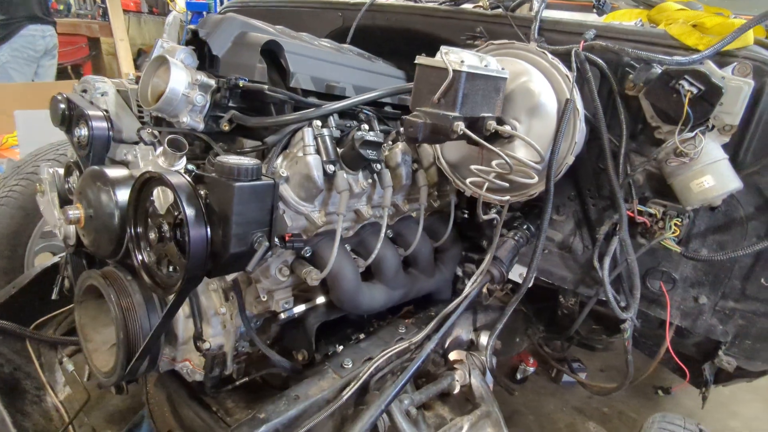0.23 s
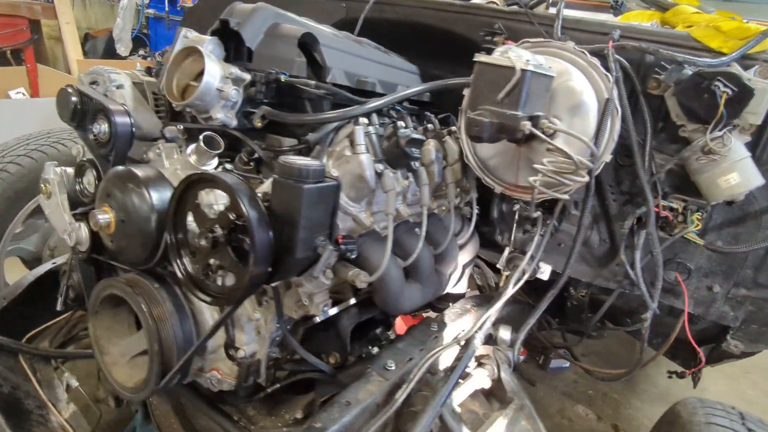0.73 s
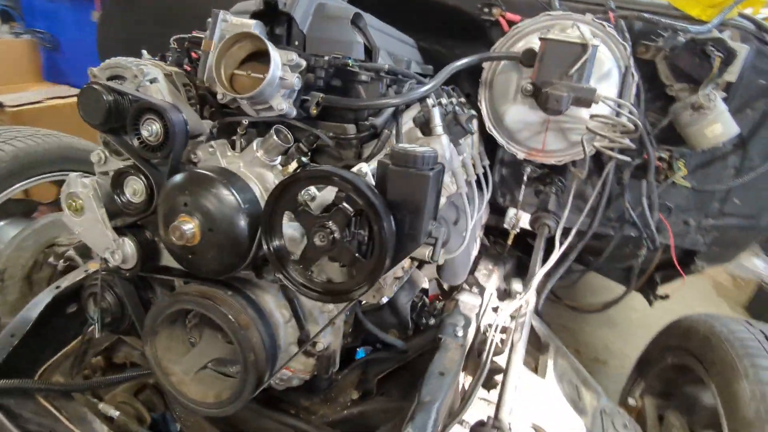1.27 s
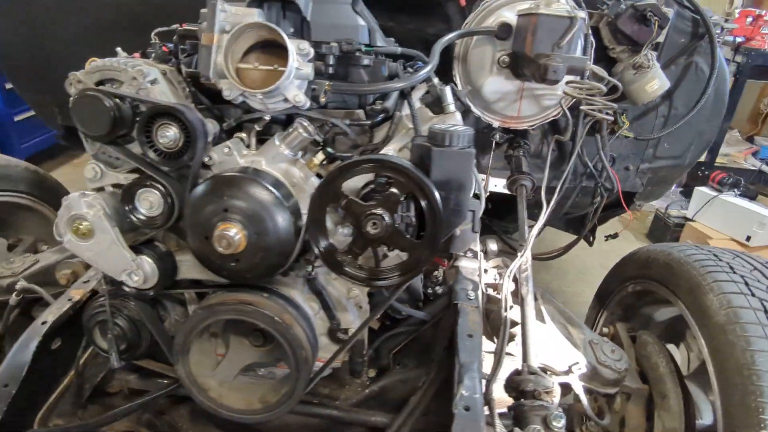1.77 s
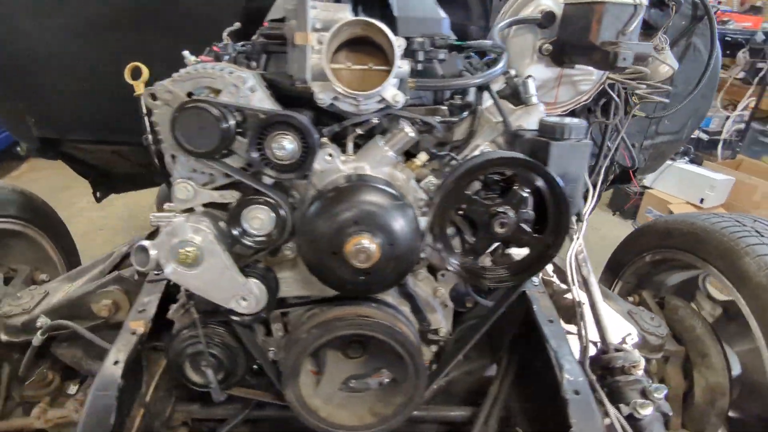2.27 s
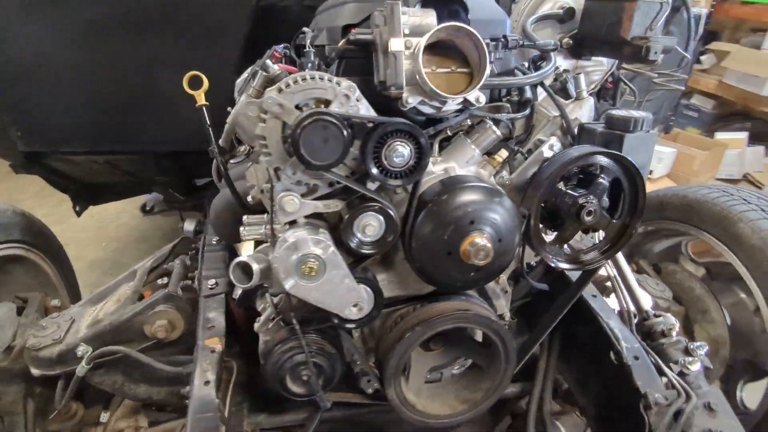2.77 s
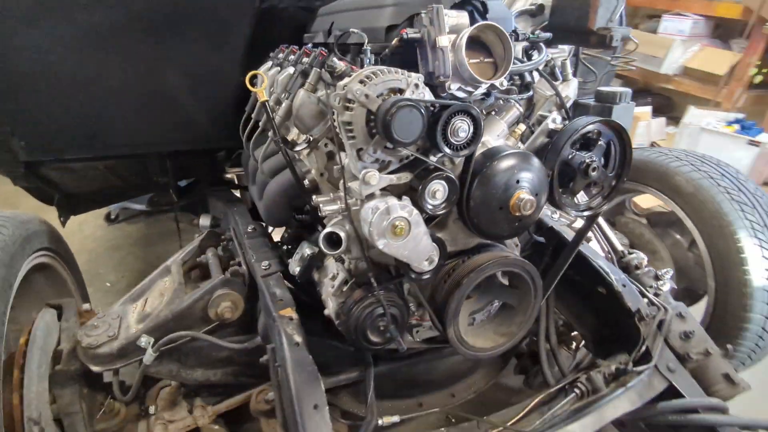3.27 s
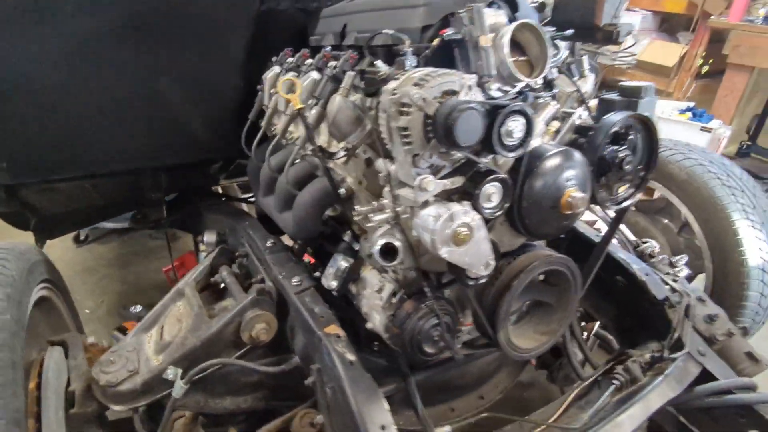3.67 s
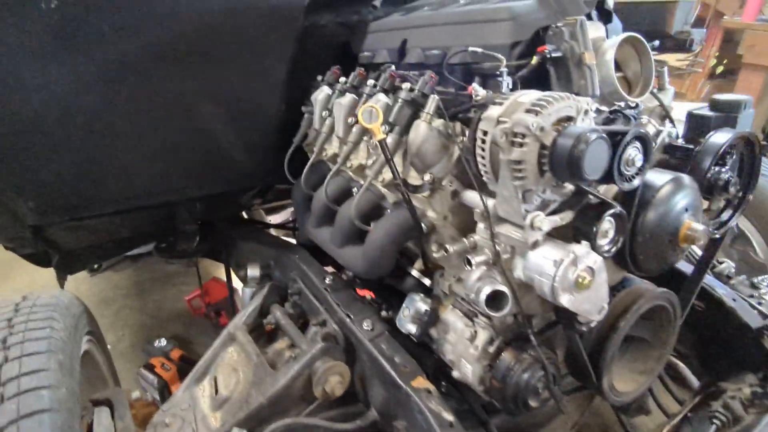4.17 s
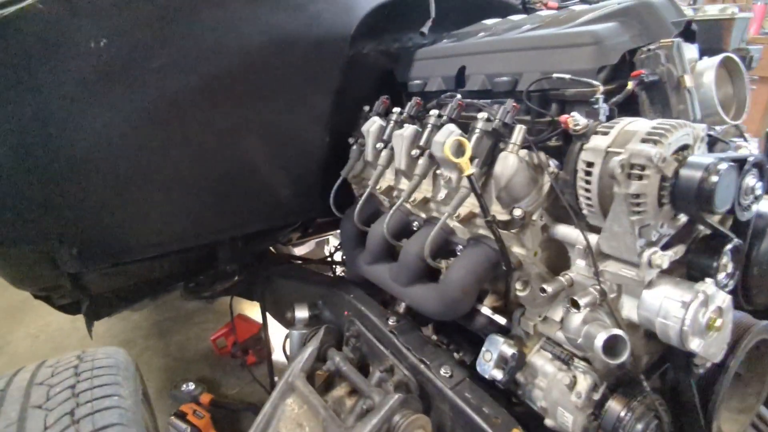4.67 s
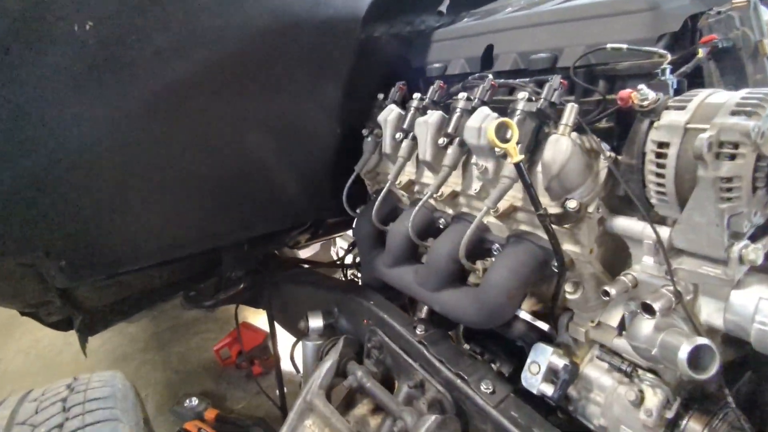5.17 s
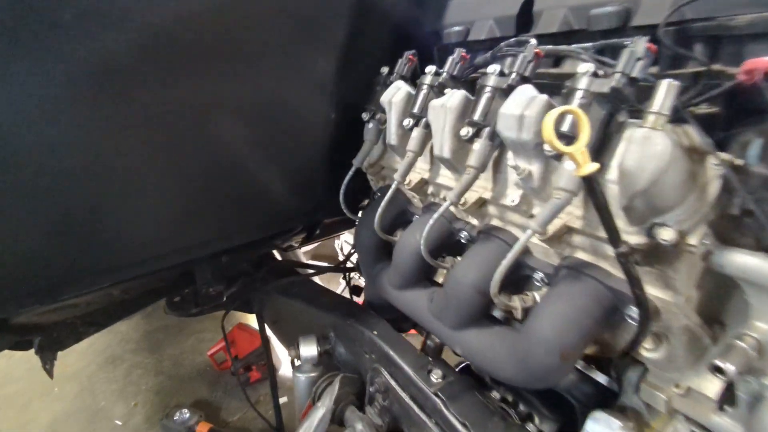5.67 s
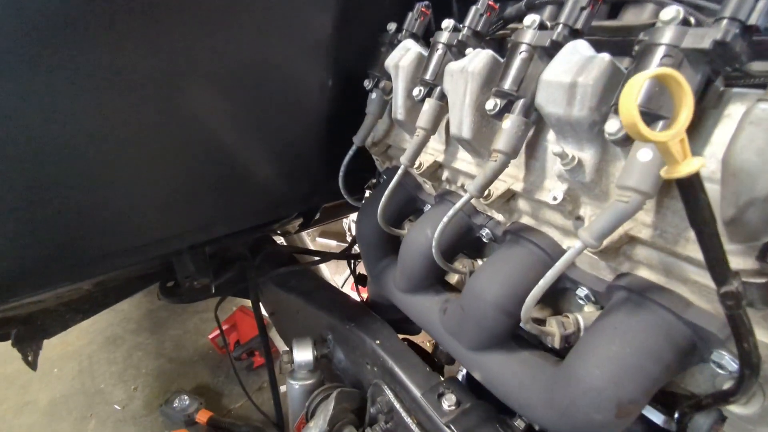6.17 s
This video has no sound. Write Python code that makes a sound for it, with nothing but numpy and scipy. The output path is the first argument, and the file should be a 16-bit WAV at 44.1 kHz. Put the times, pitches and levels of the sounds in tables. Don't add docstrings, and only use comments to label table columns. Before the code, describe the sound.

A low throbbing electric motor hum fills a workshop and grows louder, while shoe soles softly tap, drag and scrape on gritty concrete.

```python
import sys
import numpy as np
from scipy import signal
from scipy.fft import rfft, irfft, next_fast_len
from scipy.io import wavfile
from scipy.ndimage import uniform_filter1d, map_coordinates

SR = 44100
rng = np.random.default_rng(int(sys.argv[2]) if len(sys.argv) > 2 else 0)


def wav_out(sig):
    wavfile.write(sys.argv[1], SR, np.round(np.clip(np.atleast_2d(sig).T, -1, 1) * 32767).astype(np.int16))


def gain_from_db(level_db):
    decades = np.asarray(level_db, float) / 20
    return 10 ** decades


N = 282681


def unit(x):
    return x / np.sqrt(np.mean(x ** 2) + 1e-20)


def along(points, hz):
    f, value = np.transpose(points)
    return np.interp(np.log(hz + 1), np.log(f + 1), value)


def curves(rows):
    s, *columns = np.transpose(rows)
    return [np.interp(np.arange(N) / SR, s, column) for column in columns]


def wobble(rate):
    knots = rng.standard_normal(int(N * rate / SR) + 4)
    return map_coordinates(knots, [np.arange(N) * rate / SR])


def filtered(x, response):
    m = next_fast_len(N + 8192)
    return irfft(rfft(x, m) * response(np.fft.rfftfreq(m, 1 / SR)), m)[..., :N]


def tone(hz, db, drift, start=0):
    phase = 2 * np.pi * hz * (np.arange(N) / SR - start) + drift * wobble(1.7)
    return np.sqrt(2) * gain_from_db(db) * np.cos(phase)


def rush(spectrum, alike, patchy_db):
    z = signal.stft(rng.standard_normal((2, N)), nperseg=512)[2]
    patches = uniform_filter1d(rng.standard_normal(z.shape[1:]), size=6, axis=0)
    patches = uniform_filter1d(patches, size=12, axis=1)
    pair = signal.istft(z * gain_from_db(patchy_db * unit(patches)), nperseg=512)[1][:, :N]

    def mid_side(hz):
        turn = np.arccos(np.clip(along(alike, hz), -1, 1)) / 2
        return gain_from_db(along(spectrum, hz)) * [np.cos(turn), np.sin(turn)]

    mid, side = filtered(pair, mid_side)
    return unit(np.array([mid + side, mid - side]))


def grains(hz, count, spread, cycles, uneven_db):
    start = (rng.random((2, count)) * (N - 1)).astype(int)
    pitch = hz[start] * np.exp(spread * rng.standard_normal((2, count)))
    strength = gain_from_db(uneven_db * np.minimum(rng.exponential(size=(2, count)), 3.5))
    step = np.arange(200)
    turns = pitch[..., None] * step / SR
    wave = strength[..., None] * np.sin(2 * np.pi * turns) * turns * np.exp(-turns / cycles)
    streams = []
    for s, w in zip(start, wave):
        places = (s[:, None] + step).ravel()
        streams.append(np.bincount(places, w.ravel(), N + len(step))[:N])
    return unit(np.array(streams))


# t/s, twice-shaft level/dB, mains buzz level/dB
MOTOR_WALK = [(0, -50.5, -66.8), (.9, -50.2, -69), (1.4, -49.8, -59.8), (1.9, -48.6, -55.3),
              (2.4, -46, -51.6), (2.9, -43.3, -49.5), (3.6, -41.7, -51.3), (4.9, -39.8, -48.1),
              (6.41, -39.5, -46)]


def motor():
    shaft_hz, buzz_hz, first_throb_s = 58.8, 120.07, .058
    twice_db, buzz_db = curves(MOTOR_WALK)
    away_db = twice_db - twice_db.max()
    hum = tone(2 * shaft_hz, twice_db, .04, first_throb_s)
    buzz = tone(buzz_hz, buzz_db, .04, first_throb_s)
    shaft = tone(shaft_hz, -45.1 + .27 * away_db, .04, first_throb_s)
    sum_tone = tone(shaft_hz + buzz_hz, -57.5 + away_db, .04, first_throb_s)
    return hum + buzz + shaft + sum_tone


# f/Hz, level/dB (rms)
FAN_LINES = [(41.2, -60), (44.87, -63), (89.76, -57), (235.2, -70), (239.95, -68), (390, -72), (470.3, -69)]


def fans():
    return sum(tone(hz, db - 1 + 1.5 * wobble(1.5), .25) for hz, db in FAN_LINES)


# t/s, rumble level/dB, rush level/dB
AIR_LEVELS = [(0, -52, -54), (1.2, -55, -54.5), (2.2, -52.5, -55), (3.5, -52.5, -54), (4.5, -55.5, -55.5),
              (5.5, -54, -56), (6.41, -55.5, -58.5)]
# f/Hz, level/dB (per Hz)
RUMBLE_COLOUR = [(28, -21), (38, -18.5), (55, 21.5), (75, 18), (100, 19), (140, 18), (165, 16), (250, -2),
                 (400, -47)]
# f/Hz, level/dB (per Hz)
RUSH_COLOUR = [(120, -42), (200, 0), (250, -3.5), (400, -6.5), (500, -8.5), (950, -12.5), (1400, -19.5),
               (2100, -19), (2600, -26.5), (3500, -35), (5600, -52.5), (6500, -48), (7400, -61.5),
               (15600, -82)]
# f/Hz, left-right likeness [0 to 1]
AIR_LIKENESS = [(60, 0.65), (150, 0.77), (350, 0.89), (700, 0.23), (1400, 0.25), (3000, 0.081), (7000, .05)]
# t/s, lead [ms]
LEFT_LEAD = [
    (0, .33),
    (3.2, .33),
    (4.4, .05),
    (5.4, .05),
    (6.41, .3),
]


def air():
    rumble_db, rush_db = curves(AIR_LEVELS)
    rumble = gain_from_db(rumble_db + 4 + 1.2 * wobble(12)) * rush(RUMBLE_COLOUR, AIR_LIKENESS, 1.2)
    hiss = gain_from_db(rush_db + 1.5) * rush(RUSH_COLOUR, AIR_LIKENESS, 1.1)
    left, right = rumble + hiss
    late = np.arange(N) - np.round(curves(LEFT_LEAD)[0] * SR / 1000)
    return np.array([left, right[np.clip(late, 0, N - 1).astype(int)]])


# t/s, peak level/dB, f/Hz
FLOOR_BUMPS = [(0.116, -32, 105.7), (0.269, -43.5, 126), (0.941, -45, 180), (1.05, -39, 124),
               (1.27, -39, 129), (1.449, -38, 98), (1.7, -35, 97), (1.983, -37.5, 109), (2.069, -34, 122),
               (2.339, -32, 118), (2.838, -46, 119), (4.09, -42, 131), (4.645, -40, 102), (4.841, -34, 101),
               (4.979, -49, 100)]


def bumps():
    out, t = np.zeros(N + SR), np.arange(SR // 5) / SR
    rise = t / .011
    for s, db, hz in FLOOR_BUMPS:
        out[round(s * SR):][:len(t)] += gain_from_db(db) * rise * np.exp(1 - rise) * np.sin(2 * np.pi * hz * t)
    return out[:N]


# t/s, skid [s], sole scrape level/dB, dust hiss level/dB, sole f/Hz
SOLE_SCUFFS = [(.15, .02, -65, -98.5, 1510), (1.22, .03, -58.5, -77.5, 1663), (1.904, .03, -68, -85, 1600),
               (2.311, .02, -59.5, -74, 1680), (3.32, 0.0079, -64, -80.5, 1900),
               (3.699, 0.0061, -59.5, -63, 2020), (3.835, 0.014, -60.5, -74, 1896),
               (4.095, 0.068, -61, -96, 2140), (4.48, .13, -42.5, -48.5, 1555),
               (4.62, 0.057, -49.5, -48.5, 1600), (5.113, .03, -56.5, -89.5, 1383),
               (5.475, .02, -60.5, -68, 1413), (6.233, .015, -64.5, -81, 1534)]
# t/s, skid [s], sole scrape level/dB, dust hiss level/dB, sole f/Hz
SOLE_TAPS = [(.289, .005, -64, -84.5, 1524), (.993, 0.055, -63, -85.5, 1304), (2.2, 0.012, -70, -75, 1640),
             (2.43, 0.011, -61, -75.5, 1710), (2.589, 0.021, -68, -67.5, 1706),
             (2.957, .015, -67, -84, 1800), (3.036, .01, -67, -73.5, 1830),
             (3.59, .015, -49.5, -53.5, 1314), (3.606, 0.039, -41, -46, 1434),
             (4.031, 0.0058, -49.5, -75, 1720), (4.204, 0.011, -61, -78.5, 1730),
             (4.298, 0.021, -58, -77, 1310), (4.367, 0.041, -53, -61.5, 1600),
             (5.418, 0.017, -50.5, -63.5, 922), (5.502, 0.0076, -63, -62, 1484)]
# t/s, skid [s], sole scrape level/dB, dust hiss level/dB, sole f/Hz
SOLE_DRAGS = [
    (1.06, .14, -60.5, -81.5, 1205),
    (1.95, 0.12, -66, -90.5, 1600),
    (2.19, .19, -59, -79, 1640),
    (3.205, 0.045, -55.5, -63.5, 1874),
    (3.72, .08, -59.5, -82.5, 1904),
    (5.07, 0.072, -55.5, -81.5, 1310),
    (5.53, .05, -66, -79.5, 1494),
]


def strokes():
    swings, sag = 0.71, 22
    idle_db, idle_hz = -70.5, 1600
    t = np.arange(0, N, 16) / SR
    rows = [(*r, 5000, 820) for r in SOLE_TAPS]
    rows += [(*r, 1380, 445) for r in SOLE_SCUFFS]
    rows += [(*r, 240, 340) for r in SOLE_DRAGS]
    s, skid, sole_db, dust_db, hz, rise, fall = np.array(rows).T[..., None]
    before = rise * np.maximum(s - t, 0)
    after = fall * np.maximum(t - s - skid, 0)
    drained = sag * np.clip(t - s, 0, skid) + swings * after
    sole_db = sole_db - swings * before - drained
    dust_db = dust_db - before - after
    grit_db = -6.5 + sole_db + 0.35 * (dust_db - sole_db)
    power, idle = gain_from_db(2 * sole_db), gain_from_db(2 * idle_db)
    total = power.sum(0) + idle
    pitch = hz * (1 + 0.018 * np.minimum(swings * after, 20))
    pitch = ((power * pitch).sum(0) + idle * idle_hz) / total
    dust = np.sqrt(gain_from_db(2 * dust_db).sum(0))
    grit = np.sqrt(gain_from_db(2 * grit_db).sum(0) + gain_from_db(2 * -86))
    return [np.interp(np.arange(N) / SR, t, v) for v in (dust, grit, np.sqrt(total), pitch)]


# f/Hz, level/dB (per Hz)
DUST_COLOUR = [(3000, -18), (5500, 2), (8000, 4.5), (10000, 0), (12000, 6.5), (14000, 1), (15800, -5)]


def scuffs():
    dust, grit, sole, sole_hz = strokes()
    dust = dust * gain_from_db(1.2 * wobble(150)) * rush(DUST_COLOUR, [(1000, 0.16)], patchy_db=0.5)
    grit = grit * grains(np.full(N, 3700), 8000, .18, 1.3, 2.5)
    left, right = grains(sole_hz, 5000, .29, 1.1, 2.8)
    chatter = unit(np.array([left + 0.14 * right, right + 0.077 * left]))
    return dust + grit + sole * chatter


# t/s, left over right level/dB
FEET_SIDE = [(0, -1), (1.1, -3), (2.5, -4.5), (3.6, -2), (3.9, -4), (4.1, -10.5), (4.28, 0), (4.39, 9),
             (4.47, -0.5), (4.68, -2), (5.1, 0), (5.5, -3), (6.41, 0.5)]


def place_feet(x):
    pan_db, = curves(FEET_SIDE)
    return x * gain_from_db(np.array([pan_db, -pan_db]) / 2)


# t/s, crack peak level/dB, sole knock level/dB, left over right level/dB
GRIT_TICKS = [(0.2884, -67, -66, 11), (0.9928, -68, -69, 3), (1.9178, -62, -57, -12),
              (2.2012, -61.5, -67, -6), (2.4292, -66, -69, 1), (2.5938, -45, -69, 6),
              (2.9563, -70, -53, -7), (3.035, -58, -63.5, -1), (3.8388, -58, -51, 0),
              (4.026, -70, -61.5, -7.5), (4.0336, -51, -49, -13.5), (4.2025, -63.5, -59, -5),
              (4.2953, -67, -53, -4.5), (4.3657, -51, -46, 13.5), (4.9223, -77, -73, 1),
              (5.1127, -64, -46, 4), (5.417, -54, -45.5, -3), (5.5037, -40.5, -57, -5.5),
              (5.641, -72, -71.5, 2)]


def ticks():
    out, t = np.zeros((2, N + SR)), np.arange(SR // 20) / SR
    for s, db, knock_db, pan_db in GRIT_TICKS:
        crack = rng.standard_normal((2, len(t))) * gain_from_db(db - 2 - 60 * t / .005)
        knock = gain_from_db(knock_db + 6 - 60 * t / .009) * np.sin(2 * np.pi * rng.uniform(1100, 1600) * t)
        out[:, round(s * SR):][:, :len(t)] += (crack + knock) * gain_from_db(np.array([[pan_db], [-pan_db]]) / 2)
    return out[:, :N]


# f/Hz, time to fall 60 dB [s]
ROOM_DECAY = [
    (500, 0.32),
    (2000, 0.61),
    (6000, 0.44),
    (14000, 0.23),
]


def shop(x):
    hz, t, z = signal.stft(rng.standard_normal((2, SR // 2)), SR, nperseg=256)
    fading = gain_from_db(-60 * t / along(ROOM_DECAY, hz)[:, None])
    tail = signal.istft(z * fading, SR, nperseg=256)[1]
    return signal.fftconvolve(x, tail / np.linalg.norm(tail[0]), axes=1)[:, :N]


# t/s, rolling or scraping [s], level/dB,
# f/Hz, width over pitch [ratio]
ROLLING_STONES = [(3.605, .045, -45, 1590, .5), (3.6, .05, -52, 790, .35), (3.61, 0.089, -64.5, 5200, .3),
                  (4.09, .05, -71, 2700, 0.23), (4.125, 0.044, -55.5, 2430, 0.3),
                  (4.1, .07, -78.5, 6000, 0.47), (4.474, .06, -50, 3700, 0.19),
                  (4.475, .16, -46.5, 1560, 0.32), (4.85, .85, -81.5, 4760, 0.58),
                  (5.111, .025, -51, 1400, .2), (5.419, 0.018, -59, 4960, .17)]


def stones():
    out, t = np.zeros((2, N)), np.arange(N) / SR
    for s, rolling, db, hz, width in ROLLING_STONES:

        def ring(f):
            damping = 1j * f * width * hz
            return (damping / (hz * hz - f * f + damping)) ** 2

        rattle = unit(filtered(rng.standard_normal((2, N)) * gain_from_db(2 * wobble(300)), ring))
        caught = 2 * (s - t)
        let_go = (t - s - rolling) / (1 + 12 * rolling ** 2)
        outside = np.maximum(np.maximum(caught, let_go), 0)
        out += rattle * gain_from_db(db - 1100 * outside)
    return out


def scene():
    feet = place_feet(scuffs() + stones()) + ticks()
    return motor() + fans() + air() + bumps() + feet + gain_from_db(-12) * shop(feet)


def roll_off(x):
    return signal.sosfilt(signal.butter(12, 15750, fs=SR, output="sos"), x)


def record(dry):
    mix = filtered(dry, lambda hz: hz < 15750)
    return roll_off(mix)


dry = scene()
out = record(dry)
wav_out(out)
```